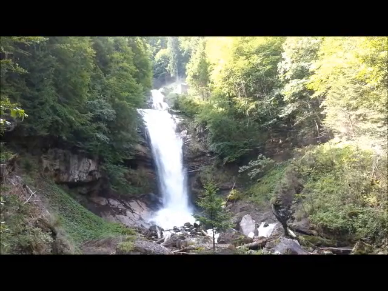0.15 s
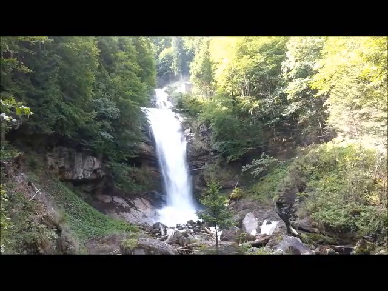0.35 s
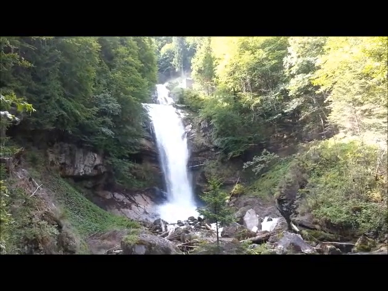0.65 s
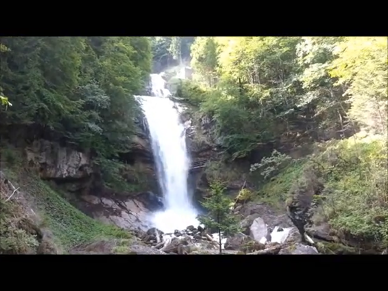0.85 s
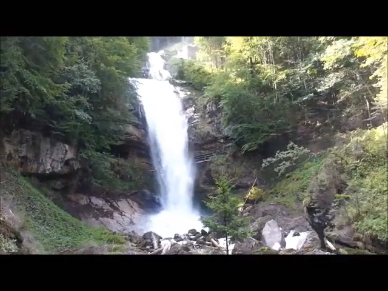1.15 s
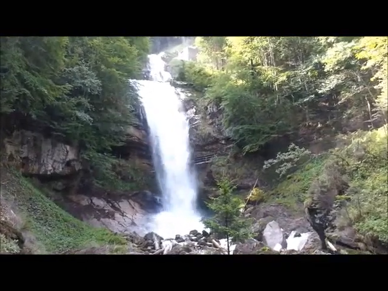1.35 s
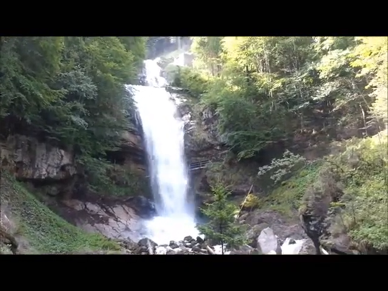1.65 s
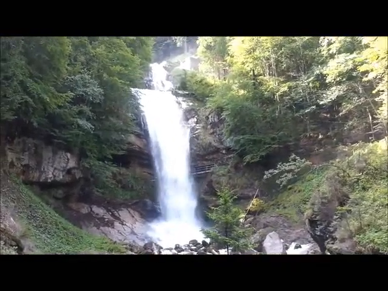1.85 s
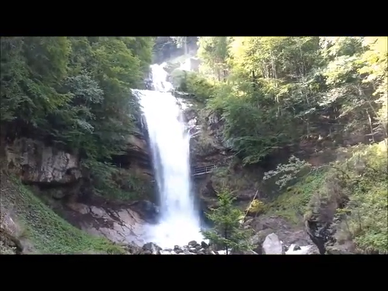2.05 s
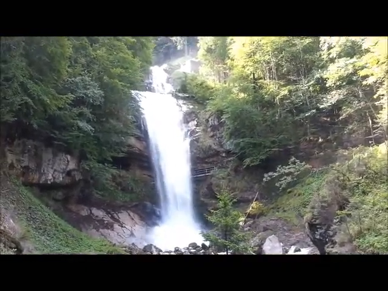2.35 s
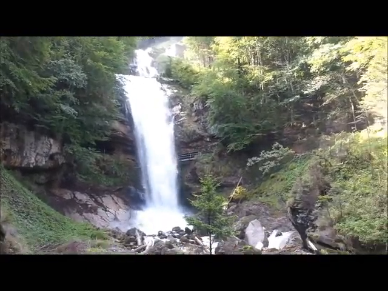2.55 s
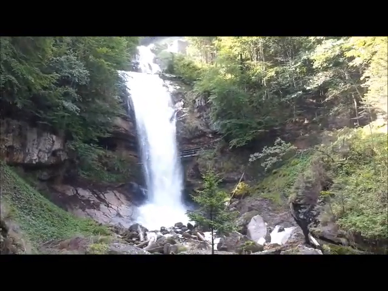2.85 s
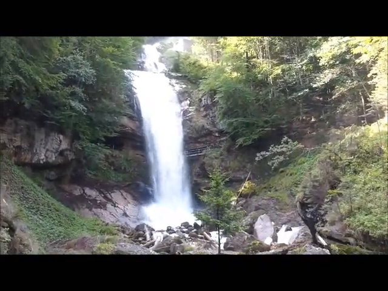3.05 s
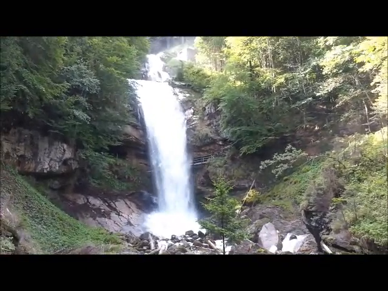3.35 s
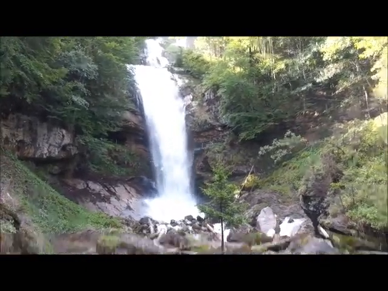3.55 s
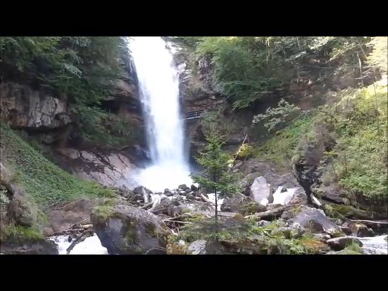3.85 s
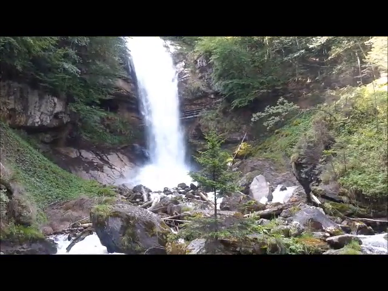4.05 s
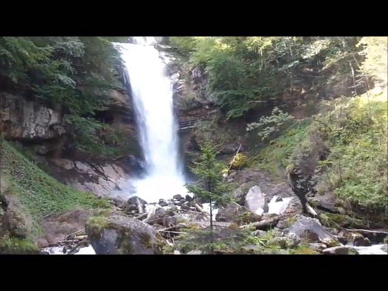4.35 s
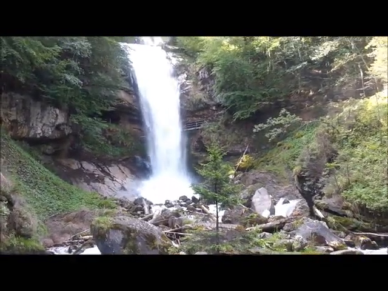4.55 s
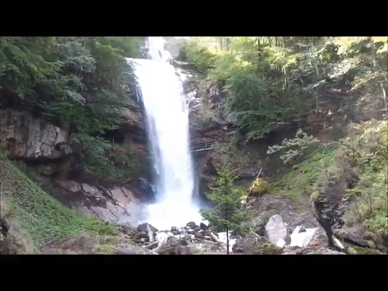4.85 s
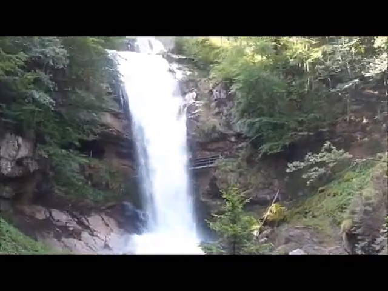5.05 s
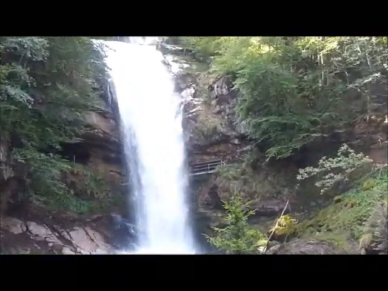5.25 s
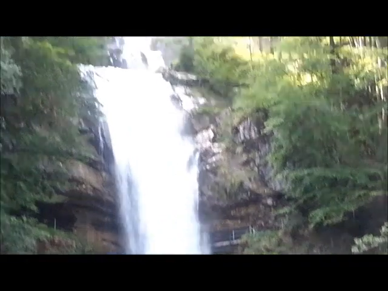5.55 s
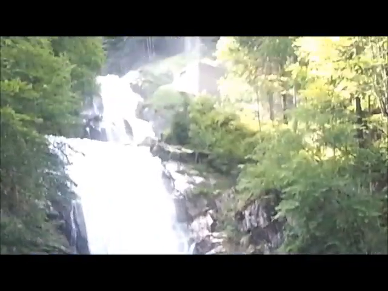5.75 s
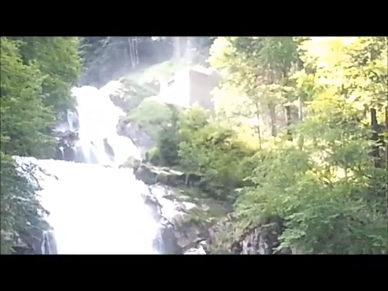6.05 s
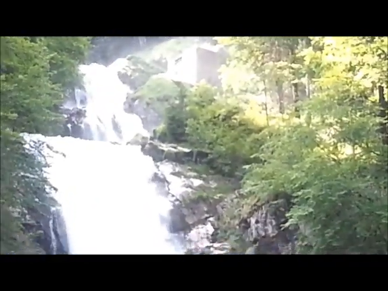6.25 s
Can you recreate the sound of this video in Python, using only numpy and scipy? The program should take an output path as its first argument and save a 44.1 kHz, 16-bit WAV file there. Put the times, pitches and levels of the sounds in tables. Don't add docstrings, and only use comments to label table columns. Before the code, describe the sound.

A big waterfall across a wooded gorge gives a loud, constant rush from start to end. Countless impacts fuse into broad noise centred in the mids, with fine bubbly splash grain inside. Level barely drifts; the spray brightens and softens slightly with the breeze. A small camera's stereo microphone thins the deep bass and dulls the highest treble.

```python
import sys
import numpy as np
from scipy import signal
from scipy.fft import rfft, irfft, dct, next_fast_len
from scipy.io import wavfile
from scipy.ndimage import uniform_filter1d

SR = 44100
rng = np.random.default_rng(int(sys.argv[2]) if len(sys.argv) > 2 else 0)


def master(y):
    cut = np.clip(np.atleast_2d(y).T, -1, 1)
    pcm = np.round(cut * 32767)
    wavfile.write(sys.argv[1], SR, pcm.astype(np.int16))


def volts(x):
    e = np.asarray(x, float) / 20
    return 10 ** e


N = 281799


def read(points, hz):
    point_hz, value = np.transpose(points)
    return np.interp(np.log(hz + 1), np.log(point_hz + 1), value)


def evened(x):
    return x / np.sqrt(np.mean(np.abs(x) ** 2) + 1e-20)


def above(hz, edge_hz):
    return (hz ** 2 / (hz ** 2 + edge_hz ** 2))[:, None] ** 2


def drifting(count, smooth):
    return evened(uniform_filter1d(rng.standard_normal(count), size=smooth))


def churn(hz, frames):
    return 5.5 * drifting(frames, 30) * (1 - above(hz, 120)) ** 2


def patches(hz, frames):
    lumps = rng.standard_normal((len(hz), frames))
    lumps = uniform_filter1d(lumps, size=14, axis=0)
    return evened(uniform_filter1d(lumps, size=14, axis=1))


def splashes(per_s=2500, spread_db=3.5):
    out = np.zeros((2, N))
    for hz in np.geomspace(600, 12000, num=16):
        t = np.arange(int(6 * SR / hz)) / SR
        rising = np.sin(2 * np.pi * hz * t * (1 + .01 * hz * t))
        grain = rising * np.hanning(len(t)) / np.sqrt(len(t))
        hit = rng.random((2, N)) < per_s / 16 / SR
        size = np.minimum(rng.exponential(1, (2, N)), 4)
        shower = signal.oaconvolve(hit * volts(spread_db * size), grain[None], axes=1)[:, :N]
        out += np.sqrt(hz) * shower
    return evened(out)


def across_ports(a, b, hz):
    # pitch_hz, left-right likeness (0 to 1)
    likeness = [(130, 0.68), (300, 0.92), (500, 0.96), (900, 0.69), (1150, 0.35), (1300, 0.54),
                (1750, 0.11), (2300, 0.35), (3100, 0.24), (3600, 0.028), (4400, 0.36), (5500, 0.27),
                (7000, 0.24), (9000, 0.02)]
    # pitch_hz, phase of the right port against the left (radians)
    port_lag = [(130, 0.12), (600, -0.92), (850, -0.88), (1200, -2.21), (1500, -2.74), (1900, -4.5),
                (2600, -5.1), (3400, -5.06), (4300, -3.3), (5300, -6.27), (6800, -4.71), (8000, -5.99)]
    same = np.clip(read(likeness, hz), 0, 1)[:, None]
    shared = same * a * np.exp(1j * read(port_lag, hz))[:, None]
    return shared + np.sqrt(1 - same ** 2) * b


def ports(x):
    # pitch_hz, level_db (per Hz)
    left_colour = [(135, -57), (158, -37), (210, -19.5), (400, -5.5), (850, -2), (1150, -3), (1800, 0.5),
                   (3000, -3.5), (4200, -3), (5200, -13), (8500, -20.5), (10000, -28), (12500, -29),
                   (14000, -26.5)]
    # pitch_hz, level_db (per Hz)
    right_colour = [(135, -57), (158, -37.5), (200, -23), (300, -11.5), (450, -6), (900, -2.5), (1600, -2),
                    (2700, -6.5), (3900, -5), (5500, -10), (8500, -19.5), (10700, -24), (11900, -29),
                    (13000, -32)]
    size = next_fast_len(N)
    hz = np.fft.rfftfreq(size, 1 / SR)
    rumble_db = 6 * np.log10(np.clip(hz / 130, 1e-2, 1))
    colour_db = np.array([read(left_colour, hz), read(right_colour, hz)]) + rumble_db
    return irfft(rfft(x, size) * volts(colour_db), size)[:, :N]


def falls(patchy_db=-0.03, gust_db=0.3, splash_db=-14):
    # start_s, flow level_db, breeze toward the camera (about -1 to 1)
    flow = [(0.0, -13, .6), (.9, -13.5, 1), (1.7, -13.65, -.6), (2.3, -13, -.9), (2.8, -13.0, -.6),
            (3.3, -13, -1.1), (3.9, -13.5, 0.2), (4.5, -13.5, .8), (5.0, -13.35, 0.25), (5.8, -13, 0.061),
            (6.39, -13, 0.5)]
    spray_gain_db, mist_gain_db, lean_gain_db = 1.2, -0.1, -.35
    roar_fade_db_per_s, mist_fade_db_per_s = -0.12, -0.17

    white = rng.standard_normal((2, N)) + volts(splash_db) * splashes()
    hz, t, (left, right) = signal.stft(white, SR, nperseg=1024, noverlap=768, boundary="even")
    right = across_ports(left, right, hz)

    start_s, level_db, toward = np.transpose(flow)
    flow_db = np.interp(t, start_s, level_db)
    breeze = np.interp(t, start_s, toward)
    tilt_s = t - t.mean()
    roar_db = roar_fade_db_per_s * tilt_s
    spray_db = spray_gain_db * breeze
    mist_db = mist_fade_db_per_s * tilt_s + mist_gain_db * breeze

    field_db = flow_db - flow_db.mean()
    field_db = field_db + (1 - above(hz, 800)) * roar_db
    field_db += above(hz, 3500) * spray_db
    field_db += above(hz, 8000) * (mist_db - spray_db)
    field_db += patchy_db * patches(hz, len(t))
    field_db += gust_db * drifting(len(t), 10)
    field_db += churn(hz, len(t))
    lean_db = above(hz, 1500) * lean_gain_db * breeze / 2

    z = np.array([left * volts(field_db + lean_db), right * volts(field_db - lean_db)])
    rush = signal.istft(z, SR, nperseg=1024, noverlap=768)[1][:, :N]
    return volts(flow_db.mean() + 0.23) * evened(ports(rush))


def gate(x, wobble_db=0.8, band_db=1.5):
    # pitch_hz, rounding step (dB)
    gate_step = [(40, -49), (125, -45), (160, -32), (200, -30), (260, -42), (8700, -40), (8950, -22),
                 (9800, -19.5), (14000, -20)]
    block, start, top_hz = 1024, 704, 14530
    lead, half = block - start, block // 2
    padded = np.pad(x, ((0, 0), (lead + block, 3 * block)), "reflect")
    at = np.arange(padded.shape[1] // block - 1)[:, None] * block + np.arange(2 * block)
    window = np.sin(np.pi * (np.arange(2 * block) + .5) / (2 * block))
    a, b, c, d = np.split(padded[:, at] * window, indices_or_sections=4, axis=2)
    lines = dct(np.dstack([-c[..., ::-1] - d, a - b[..., ::-1]]), type=4, norm="ortho")
    hz = (np.arange(block) + .5) * SR / (2 * block)

    wander = rng.standard_normal((2, len(at), 33))
    wander = evened(uniform_filter1d(wander, size=5, axis=1))
    wander_db = wobble_db * wander[..., :1]
    wander_db = wander_db + band_db * np.repeat(wander[..., 1:], repeats=32, axis=2)
    step = volts(read(gate_step, hz) + wander_db)
    lines = np.sign(lines) * np.floor(abs(lines) / step + .4054) * step * (hz < top_hz)

    folded = dct(lines, type=4, norm="ortho")
    late, early = folded[..., :half], folded[..., half:]
    rise = np.dstack([early, -early[..., ::-1]]) * window[:block]
    fall = np.dstack([-late[..., ::-1], -late]) * window[block:]
    joined = (rise[:, 1:] + fall[:, :-1]).reshape(2, -1)
    return joined[:, lead:lead + N]


def scene():
    return falls()


def band_limit(x):
    return signal.sosfilt(signal.butter(12, 14530, fs=SR, output="sos"), x)


def record(dry):
    limited = np.clip(dry, -1, 1)
    return band_limit(gate(limited))


dry = scene()
out = record(dry)
master(out)
```